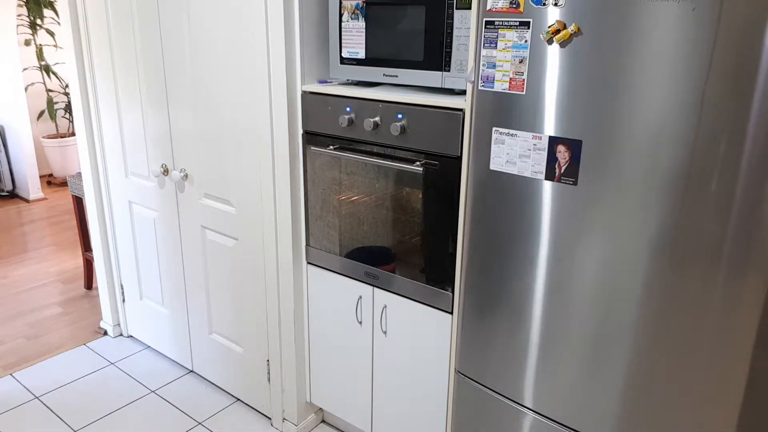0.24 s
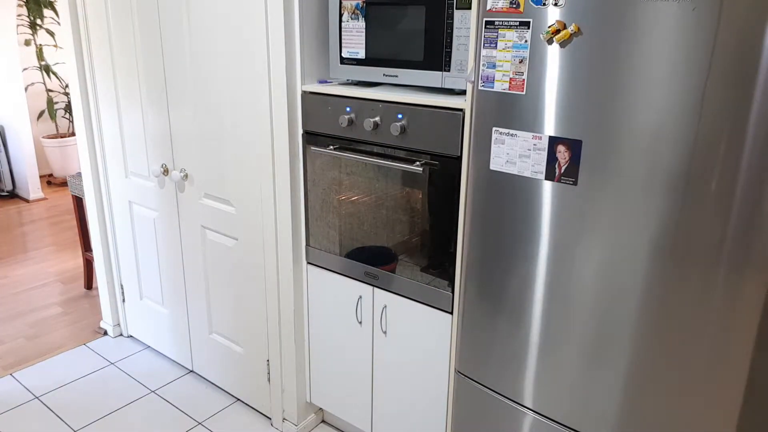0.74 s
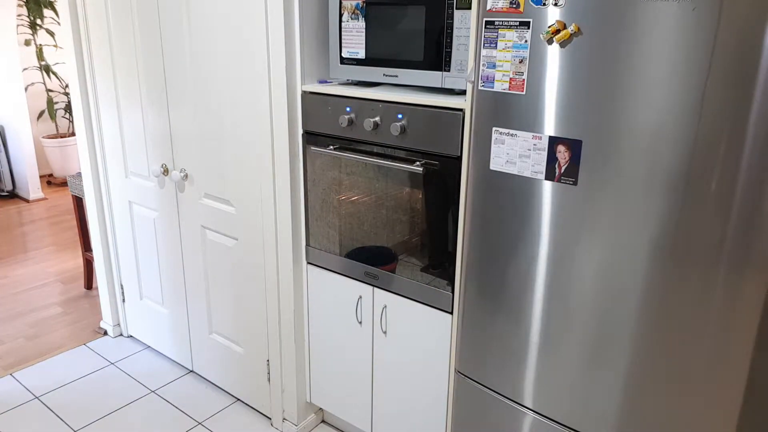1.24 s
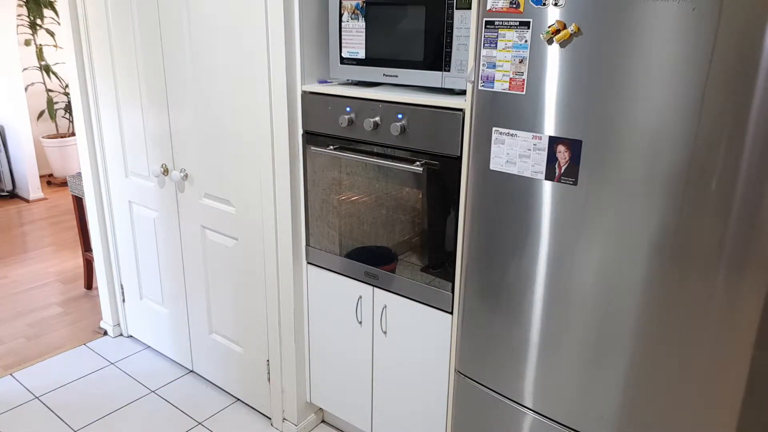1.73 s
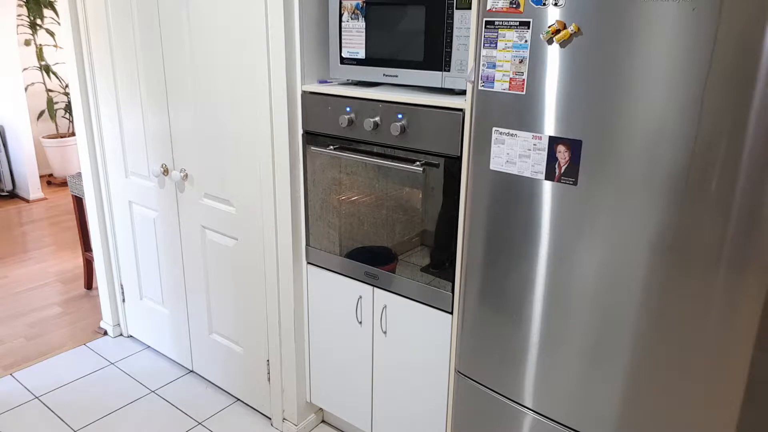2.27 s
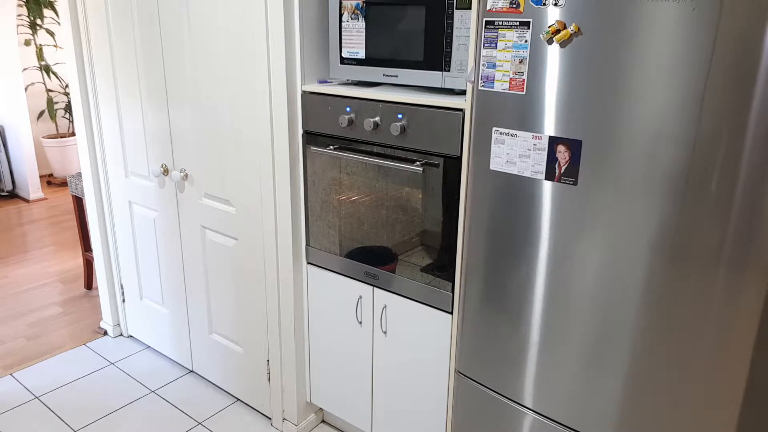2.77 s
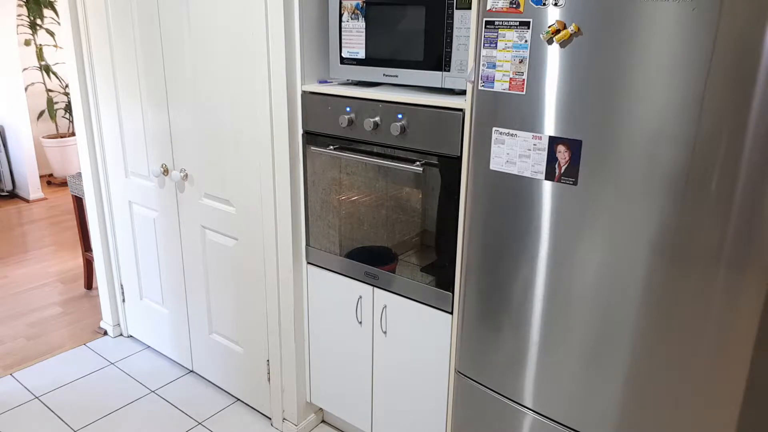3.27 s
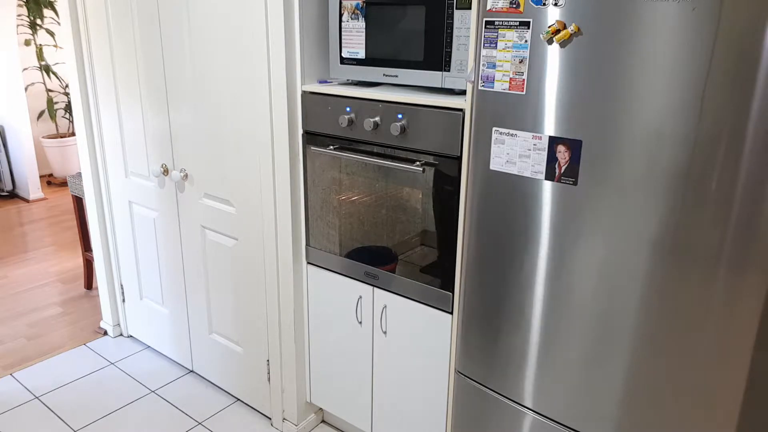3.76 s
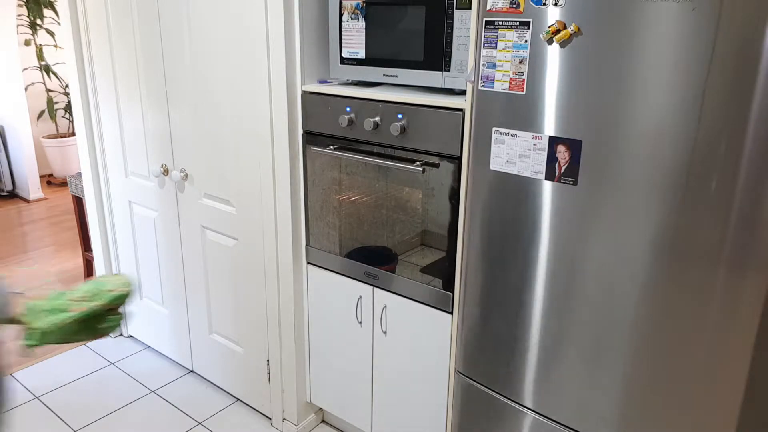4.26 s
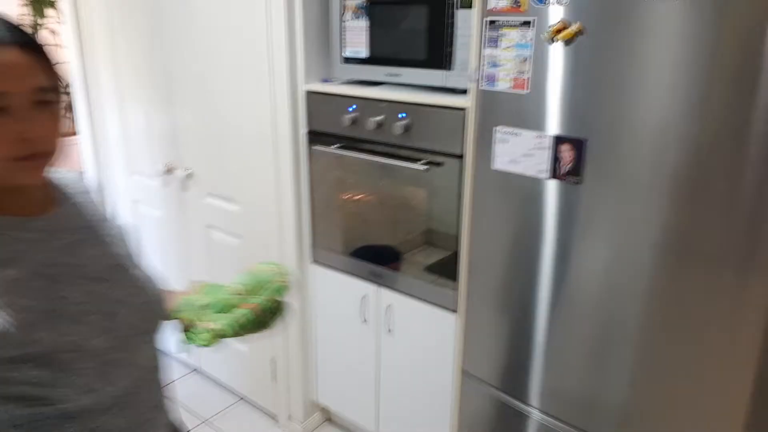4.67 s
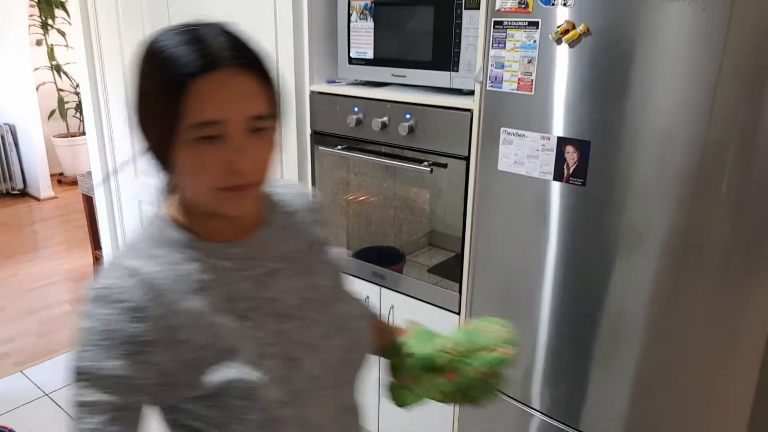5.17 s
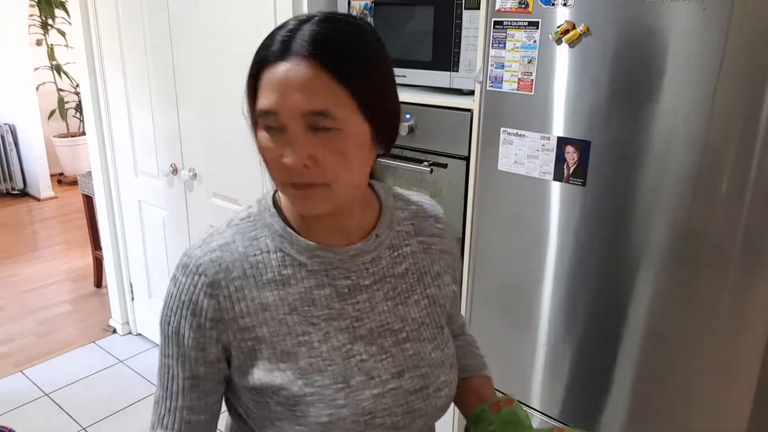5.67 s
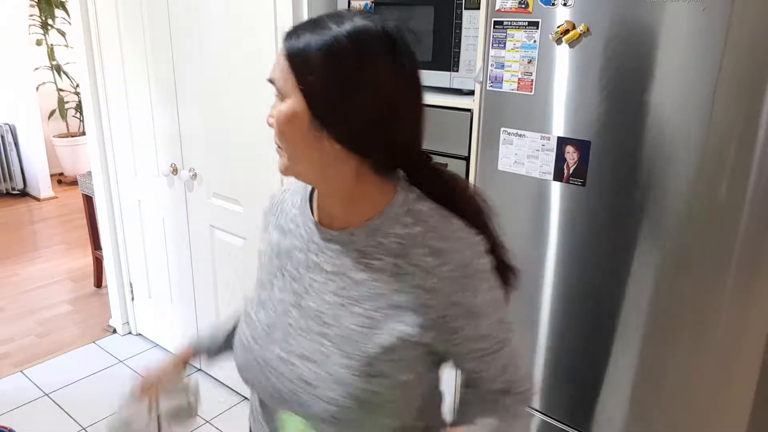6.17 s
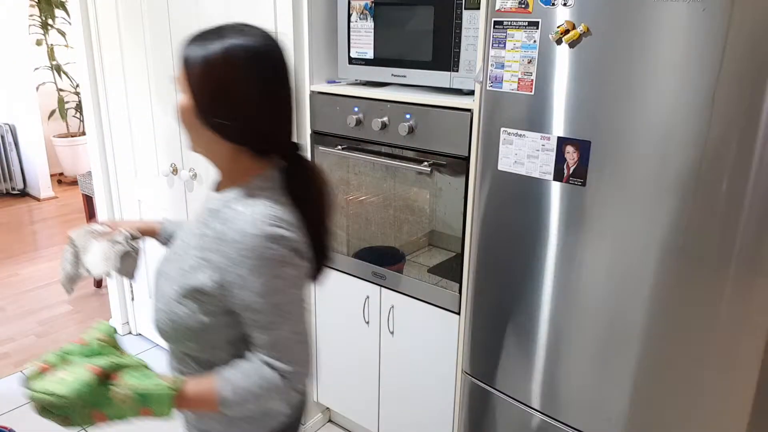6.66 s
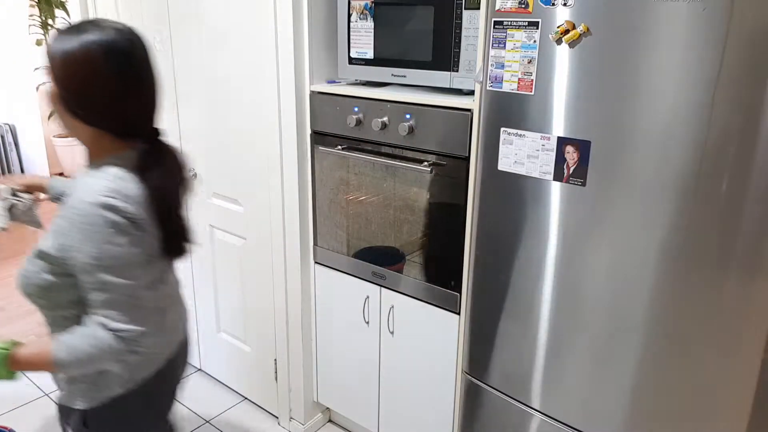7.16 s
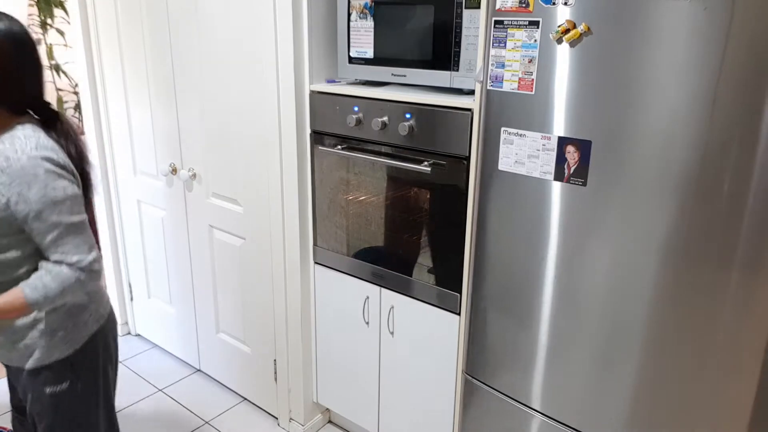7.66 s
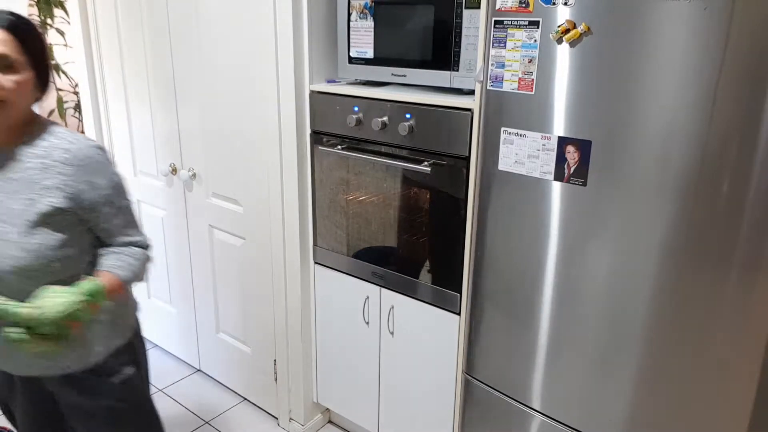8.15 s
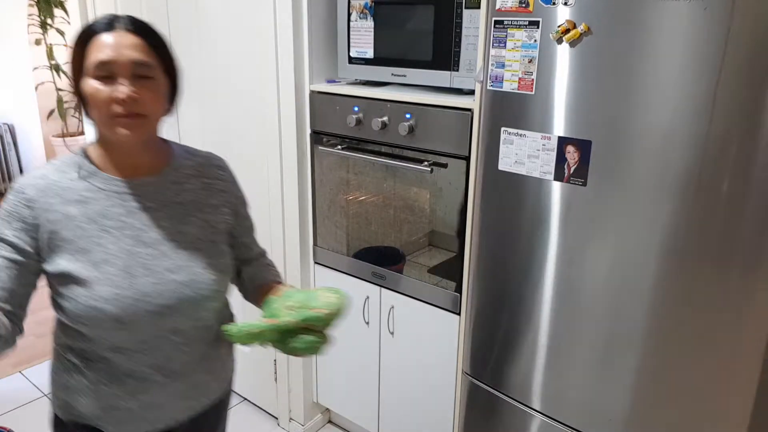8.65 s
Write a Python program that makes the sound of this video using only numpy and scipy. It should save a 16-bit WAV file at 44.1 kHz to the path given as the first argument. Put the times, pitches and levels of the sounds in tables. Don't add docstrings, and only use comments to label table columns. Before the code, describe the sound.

Loud door slam with a quick rattling bounce, quiet shuffling slippers, a burst of very close plastic clicks and bumps, then more scuffing.

```python
import sys
import numpy as np
from scipy import signal
from scipy.fft import rfft, irfft, next_fast_len
from scipy.io import wavfile
from scipy.ndimage import uniform_filter1d

SR = 44100
rng = np.random.default_rng(int(sys.argv[2]) if len(sys.argv) > 2 else 0)


def to_wav(sig):
    pcm = np.clip(np.atleast_2d(sig), -1, 1) * 32767
    pcm = np.round(pcm).astype(np.int16)
    wavfile.write(sys.argv[1], SR, pcm.T)


def gain_from_decibels(decibels):
    exponent = np.asarray(decibels, float) / 20
    return 10 ** exponent


N = 392931
STEP = 32

# [f/Hz, level/dB per Hz]
CLICK_COLOUR = [(180, -44), (300, -20), (1000, -10), (2100, -11), (2980, -12), (3900, -4), (5700, -8),
                (6800, -11), (9300, -1), (11200, 1), (13000, -7), (15300, -13), (16000, -30), (16600, -42),
                (16800, -80)]


def door(mix):
    # [t/s, blow/dB, brightness/dB per octave, panel ring/dB rel.]
    contacts = [
        (0.6678, -20, 0.5, -5.5),
        (0.6734, -13, 1.1, -5),
        (.681, -17, -1.07, -14),
        (.696, -21, -2, -14),
        (0.7183, -22.5, -1, -6.5),
        (.787, -29, -2.5, -4),
        (.792, -24.5, -0.5, -7),
        (.812, -30, -3.5, -4.5),
    ]
    # [f/Hz, level/dB per Hz]
    blow_colour = [(18, -45), (30, -24), (174, -5.5), (486, -6), (721, -8), (801, 1), (889, -10),
                   (1100, -2.5), (2060, -5.5), (4190, -13.5), (7090, -34.5), (9970, -36.5), (16000, -63.5)]
    # [f/Hz, level/dB, t60/s]
    shut_modes = [(108, -4.5, .3), (169.3, -5, 0.34), (188, -4, .15), (205, -2, 0.22), (236.3, 1, .3),
                  (292, -8, 0.3), (404.5, -4.5, 0.38), (470, -3, .3), (504, -1.5, 0.27), (590, -6, .2),
                  (641, -3.5, 0.33), (700, -7.5, .4), (798, 0.5, .2), (835, 1, .25), (921, -11, 0.25),
                  (1072, -4, 0.22), (1206, 1, .15), (1316, -9, .3), (1422, -1, .2), (1605, -8.5, .3),
                  (1736, -7, 0.33), (1949, -8, .3), (1987, 0, .2), (2042, -7.5, .3), (2128, -7.5, .3),
                  (2260, -5, .25), (2557, -10, .3), (2600, -9.5, 0.28), (3035, -6.5, 0.35),
                  (3430, -10.5, .2), (3830, -14, .2), (4270, -15, .2), (4570, -17, .2)]
    # [f/Hz, level/dB, t60/s]
    free_modes = [(173.6, 5, .3), (206, -2, .3), (237.6, -9, .3), (316, -12.5, .3), (416, -8, 0.32),
                  (479.5, -9, 0.32), (577, -15, 0.38), (695, -5, 0.62), (830, -6.5, 0.27), (930, -13, .35),
                  (1054, 1.5, 0.3), (1244, -13, 0.415), (1416, -14.5, .2), (2037, 8, 0.099),
                  (2900, -11, .1)]
    # [f/Hz, level/dB, t60/s]
    latch_modes = [(1995, 0.5, .1), (2310, -3, .08), (1200, -2, .07), (1430, -3, 0.066), (3030, -7, .06)]
    # [t/s, level/dB]
    latch_hits = [
        (0.6679, -18),
        (.6735, -14.5),
        (.697, -26.5),
        (0.7924, -31),
    ]
    # [t/s, level/dB]
    latch_ticks = [
        (.6735, -37),
        (.6915, -36),
        (.7925, -38),
    ]
    # [f/Hz, level/dB per Hz]
    hall_colour = [(600, -30), (1300, -6), (2100, 0), (3000, -6), (4500, -22), (8000, -60)]
    free_from_s, edge_db, left_right_db = .75, 10, -1.5
    next_room_db, hall_db = -34, -40

    def plate(modes):
        hz = np.array(modes)[:, :1]
        return ring(modes, np.clip((hz - 150) / 600, 0, np.pi / 2))

    shut, free, latch = plate(shut_modes), plate(free_modes), plate(latch_modes)
    out = np.zeros((2, N))
    for s, db, slope_db, panel_db in contacts:
        panel = shut if s < free_from_s else free
        add(out, s, gain_from_decibels(db + panel_db) * panel)
        add(out, s, gain_from_decibels(db) * room_tail(blow_colour, slope_db, rise_s=.001))
        add(out, s, gain_from_decibels(db + edge_db) * crack(blow_colour, .0026, 1.5 * slope_db + 1.5))
    for s, db in latch_hits:
        add(out, s, gain_from_decibels(db) * latch)
    for s, db in latch_ticks:
        add(out, s, gain_from_decibels(db) * crack(CLICK_COLOUR, .0015, 0))
    first_s = contacts[0][0]
    add(out, first_s, gain_from_decibels(next_room_db) * room_tail(blow_colour, -1.5, rise_s=.03, longer=1.9))
    add(out, first_s, gain_from_decibels(hall_db) * room_tail(hall_colour, 0, rise_s=.05, longer=1.8))
    add(mix, 0, out * gain_from_decibels([[left_right_db / 2], [-left_right_db / 2]]))


def catch(mix):
    # [t/s, direct/dB, left-right/dB, room/dB, brightness/dB per octave]
    snaps = [(4.6201, -4, 0, -24.5, 0), (4.6815, -13, -1, -30, .5), (4.6824, -14, 2, -40, .5),
             (4.6594, -28, 0, -37, 1.5), (4.6635, -29, 2, -40, 1.5), (4.6745, -29, 1, -42, 1),
             (4.6858, -13, 2, -33, 1.5), (4.6875, -15, -6, -36, 2), (4.696, -17, .3, -36, .5),
             (4.7705, -18, -6, -39, 2), (4.758, -29, .3, -38, -2.5), (4.7737, -19, -2, -41, 2),
             (4.7955, -24, 1, -37, -1), (4.873, -20, -6, -42.5, 6), (4.8855, -26, -1.5, -46, 3),
             (4.8871, -19, -5, -44, 4), (4.8897, -24, .3, -50, 4)]
    # [delay/s, level/dB]
    counter_echoes = [
        (.005, -7),
        (.0089, -10),
        (0.0138, -15),
    ]
    # [f/Hz, level/dB, t60/s]
    shell_modes = [(3880, -16, 0.013), (4455, -18, 0.03), (10800, -19, 0.011)]
    # [f/Hz, level/dB per Hz]
    room_colour = [(120, -27), (200, -1), (468, -13.5), (997, -2), (1520, -5), (2800, -2.5), (3950, -1),
                   (5200, -3.5), (7100, -8), (9400, -2.5), (12000, -10), (15000, -17.5), (15700, -16.5),
                   (16000, -60)]
    # [t/s, f/Hz, level/dB, t60/s, left-right/dB]
    pings = [(4.6202, 11600, -2, .005, -9), (4.6211, 8800, -10, .005, 4), (4.6211, 4100, -14, .007, 2),
             (4.6204, 14200, -14, .004, 6), (4.6251, 10800, -3, .0035, 0), (4.6277, 9500, -18, .004, 0),
             (4.682, 6800, -12, 0.01, -1), (4.6818, 9900, -14, 0.009, -2), (4.6815, 4600, -22, .01, 0),
             (4.6858, 8500, -17, .008, 2), (4.6858, 13500, -22, .008, 0), (4.6874, 10500, -17, 0.01, -5),
             (4.6905, 10300, -20, .012, -3), (4.6965, 8900, -21, .012, -2), (4.7075, 8500, -28, .01, 0),
             (4.7706, 9370, -19, 0.015, -7), (4.7706, 11700, -20, .012, -4), (4.7722, 10500, -22, .01, -7),
             (4.774, 12300, -22, .012, 0), (4.7955, 9800, -32, 0.019, 0), (4.873, 9570, -16, 0.011, -11),
             (4.874, 9900, -24, .01, 4), (4.8778, 9660, -27, .01, -3), (4.882, 9600, -30, .008, 0),
             (4.873, 8020, -24, 0.0128, 3), (4.887, 4905, -33, 0.021, -3), (4.7955, 4210, -34, 0.029, 0),
             (4.7955, 2506, -35, .02, 0), (4.772, 2086, -32, 0.044, -3), (4.873, 14300, -28, .012, 0),
             (4.887, 11100, -24, 0.009, -7)]
    left_lag_s, echo_slope_db = .00018, -.5
    for s, db, pan_db, room_db, slope_db in snaps:
        length_s = .00095 * gain_from_decibels(-.29 * db)
        snap = gain_from_decibels(db) * crack(CLICK_COLOUR, length_s, slope_db)[:1]
        add(mix[:1], s + left_lag_s, gain_from_decibels(pan_db / 2) * snap)
        add(mix[1:], s, gain_from_decibels(-pan_db / 2) * snap)
        for delay_s, echo_db in counter_echoes:
            echo = crack(CLICK_COLOUR, .6 * length_s, slope_db + echo_slope_db)
            add(mix, s + delay_s, gain_from_decibels(db + echo_db) * echo)
        add(mix, s, gain_from_decibels(db - 2.5 * slope_db) * ring(shell_modes, 1.8))
        add(mix, s, gain_from_decibels(room_db) * room_tail(room_colour, .5 * slope_db, rise_s=.0019, longer=.84))
    for s, hz, db, t60, pan_db in pings:
        note = ring([(hz, 0, t60), (hz * 1.045, -4, t60)], .6, rise_s=.0004)
        add(mix, s, gain_from_decibels([[db + pan_db / 2], [db - pan_db / 2]]) * note)


def slippers():
    # [f/Hz, level/dB per Hz]
    sole_colour = [(240, -31.5), (400, -6), (620, -3.5), (900, -2), (1750, -3), (3200, -4.5), (4400, -4.5),
                   (5600, -8.5), (7010, -12.5), (8600, -5.5), (11500, -9.5), (15600, -15), (16000, -59)]
    # [full pressure t/s, hold/s, pressure/dB, hollow/dB rel., grit hiss/dB rel.]
    slides = [(.215, 0.052, -56.5, 3.5, -3.5), (.572, 0.025, -73.5, 1, 0), (1.72, 0.037, -75, -2, -12),
              (1.91, 0.049, -73, 3, -3), (2.69, 0.032, -64.5, 3.5, -3.5), (2.752, 0.026, -60.5, 6, -5.5),
              (2.88, 0.0428, -59, -8, -2), (3.03, 0.044, -72, 0, 1.5), (3.2, .04, -65.5, -7, -4.5),
              (3.54, 0.03, -65, -3, 4), (4.09, .01, -64.5, -11.5, 0), (4.34, .01, -70.5, -5, 4.5),
              (4.4, 0.02, -59, -4.5, -3.5), (4.535, 0.059, -62, -26, 5), (5.04, .05, -73.5, -4, 0),
              (5.125, 0.018, -68, 4.5, -2), (5.2, .02, -71, -5, -2), (5.32, 0.076, -57, -11.5, 2.5),
              (5.54, 0.066, -55, -9, 0.5), (5.87, 0.1193, -58.5, -10.5, -2),
              (6.15, 0.016, -62.5, -1.5, -1.5), (6.55, 0.01, -63, -1.5, -4), (6.71, 0.057, -65, -3.5, 5),
              (6.82, 0.036, -73, -9, 8.5), (6.985, 0.089, -49, -4.5, 2), (7.22, 0.036, -61, -12.5, 3),
              (7.7, .02, -68.5, -3, -3), (8.52, 0.014, -61, -12.5, 1.5)]
    # [t/s, hold/s, pressure/dB, hollow/dB rel., grit hiss/dB rel.]
    stamps = [(0.0, 0.0097, -67, -9, 6), (.16, 0.029, -71, 13, 11.5), (2.34, 0.29, -84, -6, 11),
              (2.838, 0.018, -63, -4, -8), (2.857, .03, -66, -12, 5), (3.105, 0.028, -59.5, -12, -5),
              (3.138, 0.021, -63.5, -14, 4.5), (3.78, 0.0377, -58.5, -2, -5.5), (6.69, 0.048, -66, -12, 3),
              (6.925, 0.042, -73, -21, 17), (6.995, 0.022, -61.5, 9, 14.5), (7.416, 0.097, -48, -1.5, 2),
              (8.295, 0.0425, -65.5, 0.5, 2.5), (8.8, .13, -56, 1.5, 6)]
    # [t/s, level/dB]
    shuffle = [(0, -69.5), (1.3, -77.5), (2.1, -73), (2.4, -68), (2.6, -67), (3.05, -67), (3.4, -71.5),
               (4.3, -70.5), (5.5, -70), (6.4, -74.5), (7.0, -70), (7.7, -73.5), (7.9, -77), (8.2, -79),
               (8.91, -73)]
    # [t/s, level/dB]
    nearness = [
        (0, 0),
        (2.7, -2),
        (2.9, -10),
        (3.15, -2),
        (4.4, -2.5),
        (4.55, 2.5),
        (5.5, -3),
        (6.8, 2),
        (7.1, 1),
        (8.9, 0),
    ]
    # [middle t/s, length/s, f/Hz, glide/Hz, level/dB]
    squeaks = [(1.675, .12, 2150, 100, -76.5), (1.715, .05, 1950, 30, -76.5), (1.74, .06, 2750, 60, -77.5),
               (1.83, .1, 2080, -100, -73.5), (1.9, 0.14, 2305, 250.5, -71), (1.91, .12, 2520, 48.5, -67),
               (1.905, .06, 1900, -80.5, -71.5), (1.94, .07, 2850, 50, -73.5), (1.91, .06, 3800, -120, -75),
               (2.0, .08, 2450, 50, -73.5), (2.765, 0.0305, 1168, 40.5, -57.5),
               (2.787, 0.027, 1150, 39.5, -56), (2.79, .02, 2050, 50, -62), (2.765, .05, 2500, 300, -64),
               (2.756, .05, 2000, 199.5, -62.5), (2.76, 0.065, 1550, 100.5, -62.5),
               (2.887, .015, 4500, 0, -60), (2.718, .015, 3000, 0, -63), (2.717, .02, 2300, 0, -64),
               (5.02, .12, 3000, 0, -68), (5.02, .14, 4500, 0, -69), (5.14, .06, 3900, 0, -70),
               (5.03, .1, 1500, 49.5, -66), (5.13, .08, 1580, 50.5, -60), (5.35, .14, 4000, -300, -70),
               (5.56, .09, 3400, -900, -62), (5.585, .13, 2720, 81, -58), (5.93, .14, 4200, -300, -65.5),
               (6.73, .1, 4600, -300, -66)]
    falls = np.array([
        [110],
        [139],
        [170],
        [200.5],
        [219.5],
    ])
    heel_db = [
        [4.5],
        [-9],
        [-23],
        [-5],
        [-6],
    ]
    slide_rise_db_per_s, stamp_rise_db_per_s = 181, 1409.5
    heel_s, heel_fall_db_per_s = .018, 499.5
    touch_db_per_s2 = 2500
    lead_s = np.array([[0], [0], [0], [.0096], [.0096]])

    parts = split(diffuse(N, sole_colour, grain_db=2.0), [1600, 3200, 6500, 11500])
    rest_db = [[0], [-9], [-13.5], [-15.5], [-21]]
    times = np.arange(0, N + STEP, STEP) / SR
    power = gain_from_decibels(np.interp(times, *np.transpose(shuffle)) + rest_db) ** 2

    def shares(s, db, hollow_db, hiss_db):
        fabric_db = .5 + .44 * hollow_db
        air_db = hiss_db - 5 + .2 * (db + 50)
        air_db += np.interp(s, *np.transpose(nearness))
        return gain_from_decibels(db + np.array([[hollow_db], [fabric_db], [0], [hiss_db - 2.0], [air_db]]))

    for s, hold, db, hollow_db, hiss_db in slides:
        gain = stroke(s - lead_s, hold + lead_s, slide_rise_db_per_s, falls, touch_db_per_s2)
        power += (shares(s, db, hollow_db, hiss_db) * gain) ** 2
    for s, hold, db, hollow_db, hiss_db in stamps:
        share = shares(s, db, hollow_db, hiss_db)
        drag = stroke(s, hold, stamp_rise_db_per_s, falls, touch_db_per_s2)
        slap = gain_from_decibels(heel_db) * stroke(s, heel_s, stamp_rise_db_per_s, heel_fall_db_per_s)
        power += (share * drag) ** 2 + (share * slap) ** 2
    out = sum(smooth(gain) * evened(part) for gain, part in zip(np.sqrt(power), parts))
    for s, length_s, hz, glide_hz, db in squeaks:
        add(out, s - length_s / 2, gain_from_decibels(db) * squeak(length_s, hz, glide_hz))
    return out


def squeak(length_s, hz, glide_hz):
    u = np.linspace(0, 1, round(length_s * SR))
    a, b, c, d = rng.standard_normal((len(u), 4)).T
    low_pass = signal.butter(2, .06 * hz, fs=SR, output="sos")
    waver = signal.sosfilt(low_pass, np.array([a + 1j * b, c + 1j * d]))
    phase = 2 * np.pi * np.cumsum(hz + glide_hz * (u - .5)) / SR
    return evened((waver * np.exp(1j * phase)).real) * np.sin(np.pi * u)


def stand(mix):
    # [t/s, level/dB, ring time factor, hardness/dB per octave]
    jolts = [
        (4.621, -43, 1.3, 6.5),
        (4.686, -37, 0.42, -3.5),
        (4.713, -39.5, 0.32, 1),
        (4.737, -40.5, 0.26, -3),
        (4.758, -25, 1.117, 3),
        (4.768, -34.5, 0.67, -3),
        (4.795, -25.5, 0.71, 1.5),
        (4.818, -33, 1.15, -2.5),
        (4.845, -38.5, 1.1, -0.5),
        (4.905, -43.5, 0.53, 3.5),
    ]
    # [f/Hz, level/dB, t60/s]
    stand_modes = [(103, -3, 0.15), (180, -5, 0.11), (252.7, 0.5, 0.11), (326.4, -9, 0.087),
                   (413, -3.5, 0.046), (567, -4.5, 0.064), (657, -3.5, .09), (697.6, 3.5, 0.052),
                   (845.5, -11, .08), (1066, -11.5, 0.086), (1160, -20, .06)]
    t = np.arange(16384) / SR
    for s, db, longer, slope_db in jolts:
        modes = [(hz, mode_db + slope_db * np.log2(hz / 300), t60) for hz, mode_db, t60 in stand_modes]
        add(mix, s, gain_from_decibels(db) * band(ring(modes, .69, longer), 59.83, 3000))
        noise = evened(band(rng.standard_normal((len(t), 2)).T, 88.3, 500))
        add(mix, s, gain_from_decibels(db) * noise * gain_from_decibels(-5.5 - 60 * t / (.19 * longer)))


def thuds(mix):
    # [t/s, peak/dB, f/Hz]
    blows = [(0.428, -40, 91.5), (0.539, -46.5, 86.1), (1.349, -43, 135), (2.832, -39, 198.3),
             (2.8405, -30, 305), (2.843, -42, 262), (2.853, -40, 308), (2.872, -40, 323),
             (3.788, -48.5, 91.5), (5.106, -53.5, 79), (7.417, -38, 822), (8.319, -57, 108),
             (8.8, -41.5, 833), (2.8399, -39.5, 657), (2.84, -49, 1500), (2.865, -44, 921),
             (5.115, -46, 994), (5.122, -50, 598), (8.31, -44, 1095), (8.312, -47, 800)]
    for s, db, hz in blows:
        colour = [(hz / 4, -20), (hz, 0), (3 * hz, -12), (10 * hz, -35), (16000, -70)]
        note = ring([(hz, -2, .09), (hz * .36, -4, .1)], min(hz / 900, 1.5))
        add(mix, s, gain_from_decibels(db) * note)
        add(mix, s, gain_from_decibels(db - 13.0) * room_tail(colour, rise_s=.008, longer=.72))


def fridge():
    # [f/Hz, level/dB, half width/Hz]
    hum_lines = [(91.5, -70.5, 6), (305, -75.5, 3), (575, -85.5, 3)]
    # [f/Hz, half width/Hz]
    pipes = [(737, 9), (1500, 65)]
    # [t/s, hold/s, level/dB]
    low_surges = [
        (1.8, 0.64, -71),
        (3.7, .02, -70),
        (4.551, 0.42, -70),
        (6.33, 0.028, -71),
        (6.93, 0.16, -75),
        (7.46, 0.097, -78),
        (8.702, .2, -73),
    ]
    # [t/s, hold/s, level/dB]
    high_surges = [
        (2.9, .1, -89),
        (4.99, 0.1196, -70),
        (6.06, 0.2, -78),
        (6.93, 0.17, -80.5),
        (7.58, .04, -77.5),
        (8.42, .33, -77),
    ]
    surge_db_per_s = 47
    out = np.zeros((2, N))
    for hz, db, width_hz in hum_lines:
        out += gain_from_decibels(db) * evened(band(rng.standard_normal(N), hz - width_hz, hz + width_hz))
    for (hz, width_hz), idle_db, surges in zip(pipes, (-84, -87), (low_surges, high_surges)):
        level = gain_from_decibels(idle_db)
        for s, hold, db in surges:
            level = level + gain_from_decibels(db) * stroke(s, hold, surge_db_per_s, surge_db_per_s)
        whistle = band(rng.standard_normal((N, 2)).T, hz - width_hz, hz + width_hz)
        out += smooth(level) * evened(whistle)
    return out


def room_tone():
    # [t/s, level/dB]
    rumble = [(0.0, -57), (1.07, -58.5), (1.79, -62.5), (2.16, -59.5), (2.83, -56.5), (3.87, -56),
              (4.6, -58), (5.11, -60), (6.06, -62.5), (6.45, -59.5), (8.91, -58.5)]
    # [f/Hz, level/dB per Hz]
    rumble_colour = [(11, -51), (18, -11), (76, -1), (112, -4), (218, -5), (269, -13.5), (294, -2),
                     (327, -9.5), (404, -6), (449, -19), (747, -17.5), (787, -18.5), (1200, -27),
                     (1560, -59), (2640, -120)]
    # [t/s, level/dB]
    booms = [
        (0.78, -46.5),
        (3.05, -61),
        (4.77, -49.5),
        (7.64, -61),
        (8.45, -66.5),
    ]
    # [f/Hz, level/dB per Hz]
    hiss_colour = [(290, -27.5), (500, 0.5), (810, -6.5), (1290, -13), (1760, -15), (3550, -23),
                   (6660, -27), (8670, -20.5), (10500, -25), (13000, -23.5), (15700, -27.5), (16000, -68.5)]
    hiss_db, boom_rise_db_per_s, boom_fall_db_per_s = -66.5, 95, 115
    lumps = evened(uniform_filter1d(uniform_filter1d(rng.standard_normal(N), 2500), 2500))
    level = gain_from_decibels(np.interp(np.arange(N) / SR, *np.transpose(rumble)))
    for s, db in booms:
        level = level + smooth(gain_from_decibels(db) * stroke(s, 0, boom_rise_db_per_s, boom_fall_db_per_s))
    return level * gain_from_decibels(1.2 * lumps) * diffuse(N, rumble_colour) + gain_from_decibels(hiss_db) * diffuse(N, hiss_colour)


def ring(modes, spread, longer=.91, rise_s=.0029):
    hz, db, t60 = np.transpose(modes)[:, :, None]
    t60 = np.clip(t60 * longer, .002, .6)
    t = np.arange(0, 1.3 * t60.max(), 1 / SR)
    apart = spread * rng.uniform(-1.5, 1, hz.shape)
    decay = gain_from_decibels(db - 60 * t / t60)
    sides = [(decay * np.sin(2 * np.pi * hz * t + side * apart)).sum(0) for side in (-1, 1)]
    return np.array(sides) * (1 - np.exp(-t / rise_s))


def crack(colour, length_s, slope_db):
    u, hz = np.arange(1024) / SR / length_s, np.fft.rfftfreq(1024, 1 / SR)
    z = rfft(rng.standard_normal((1024, 2)).T * u * np.exp(-3 * u))
    flat = z / uniform_filter1d(abs(z), 9)
    burst = irfft(flat * gain_from_decibels(read(colour, hz) + slope_db * np.log2(hz / 1000 + 1e-3)))[:, :512]
    return burst / abs(burst).max(1)[:, None]


def room_tail(colour, slope_db=0., rise_s=.003, longer=.887):
    # [f/Hz, t60/s]
    kitchen_t60 = [(60, .7), (250, 0.57), (700, .46), (1800, 0.4888), (4800, 0.35), (10000, 0.38)]
    hz, t, z = signal.stft(diffuse(32768, colour, slope_db), SR, nperseg=256)
    t60 = longer * read(kitchen_t60, hz)[:, None]
    tail = signal.istft(z * gain_from_decibels(-60 * t / t60), SR, nperseg=256)[1]
    return tail * (1 - np.exp(-np.arange(tail.shape[1]) / SR / rise_s))


def diffuse(size, colour, slope_db=0., grain_db=0.):
    # [f/Hz, left-right likeness]
    likeness = [(60, .93), (250, .88), (550, 0.48), (1000, .1), (1300, -0.065), (2500, .05),
                (8000, 0.00092)]
    hz = np.fft.rfftfreq(size, 1 / SR)
    grains = rng.standard_normal((size, 2)).T * gain_from_decibels(grain_db * rng.exponential(1, (size, 2)).T)
    a, b = rfft(grains)
    same = np.clip(read(likeness, hz), -1, 1)
    gain = gain_from_decibels(read(colour, hz) + slope_db * np.log2(hz / 1000 + 1e-3))
    return evened(irfft(np.array([a, same * a + np.sqrt(1 - same ** 2) * b]) * gain, size))


def stroke(s, hold, rise_db_per_s, fall_db_per_s, sudden_db_per_s2=0):
    u = np.arange(0, N + STEP, STEP) / SR - s
    rise_db = rise_db_per_s * np.minimum(u, 0) - sudden_db_per_s2 * np.clip(u, -1, 0) ** 2
    return gain_from_decibels(rise_db - fall_db_per_s * np.maximum(u - hold, 0))


def smooth(gain):
    return np.interp(np.arange(N), np.arange(len(gain)) * STEP, gain)


def split(x, edges_hz):
    size = next_fast_len(x.shape[1])
    octave, z = np.log2(np.fft.rfftfreq(size, 1 / SR) + 1), rfft(x, size)
    above = [np.clip((octave - np.log2(f)) * 2 + .5, 0, 1) for f in edges_hz]
    return [irfft(z * (a - b), size)[:, :x.shape[1]] for a, b in zip([1] + above, above + [0])]


def band(x, lo_hz, hi_hz):
    return signal.sosfilt(signal.butter(3, [lo_hz, hi_hz], "band", fs=SR, output="sos"), x)


def evened(x):
    return x / np.sqrt(np.mean(x ** 2) + 1e-20)


def read(points, hz):
    f, value = np.transpose(points)
    return np.interp(np.log(hz + 1), np.log(f + 1), value)


def add(mix, s, sound):
    part = mix[:, round(s * SR):][:, :sound.shape[1]]
    part += sound[:, :part.shape[1]]


def scene():
    mix = room_tone() + fridge() + slippers()
    for source in (door, catch, stand, thuds):
        source(mix)
    return mix


def roll_off(x):
    return signal.sosfilt(signal.butter(12, 16830, fs=SR, output="sos"), x)


def record(dry):
    # [f/Hz, left-right/dB]
    left_lead = [(60, 1.5), (110, 1), (200, 2.5), (380, 3.5), (700, 6), (1290, 4), (2380, 5.5), (4400, 3.5),
                 (8120, 6.5), (15000, 0)]
    size = next_fast_len(N)
    lead_db = read(left_lead, np.fft.rfftfreq(size, 1 / SR)) * np.array([[.5], [-.5]])
    x = irfft(rfft(dry, size) * gain_from_decibels(lead_db), size)[:, :N]
    x = x / (1 + (abs(x) / .98) ** 4) ** (1 / 4)
    low_pass = signal.firwin(301, 16650, window=("kaiser", 9), fs=SR)
    x = signal.oaconvolve(x, low_pass[None], "same", axes=1)
    return roll_off(x)


dry = scene()
out = record(dry)
to_wav(out)
```